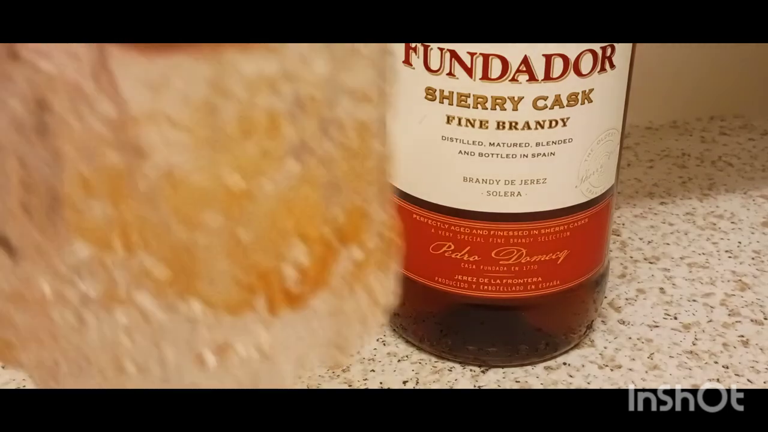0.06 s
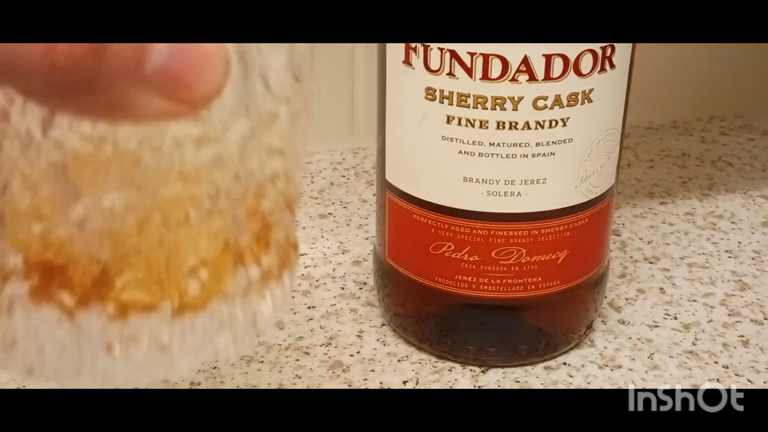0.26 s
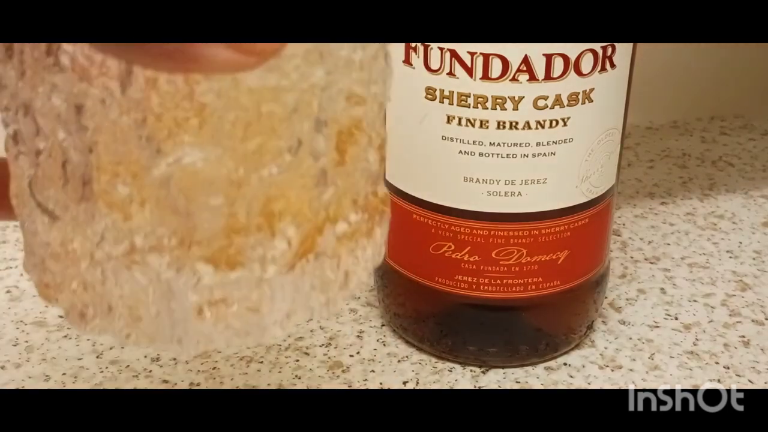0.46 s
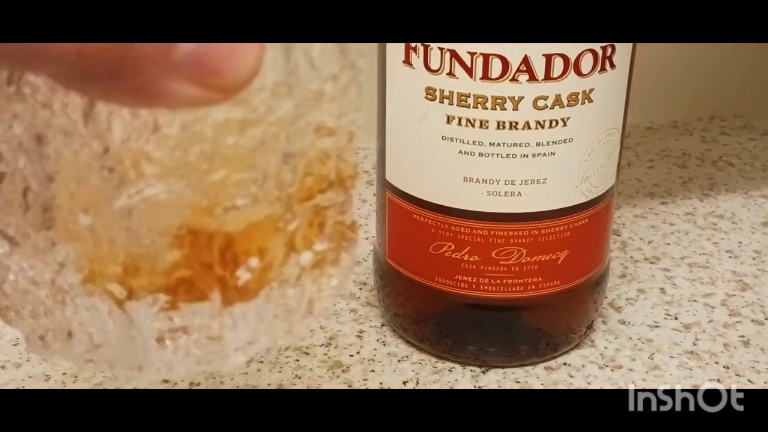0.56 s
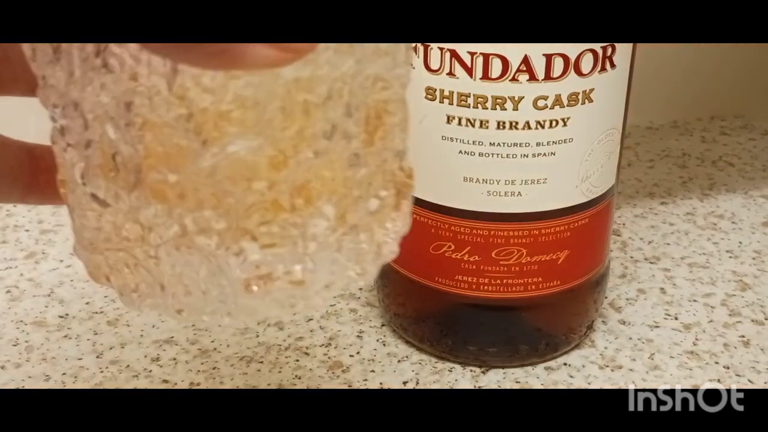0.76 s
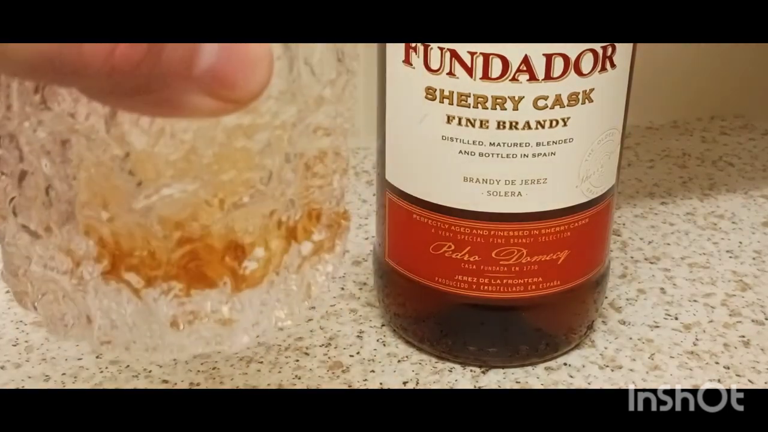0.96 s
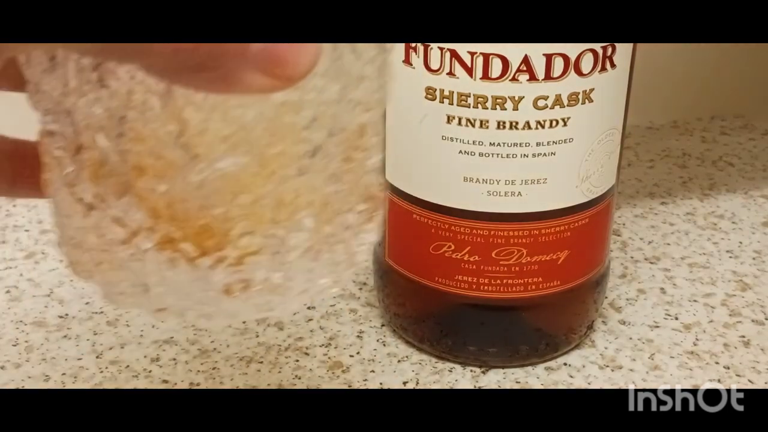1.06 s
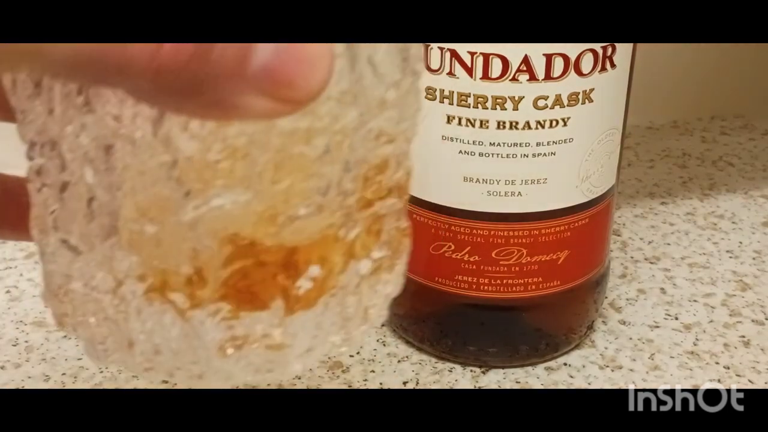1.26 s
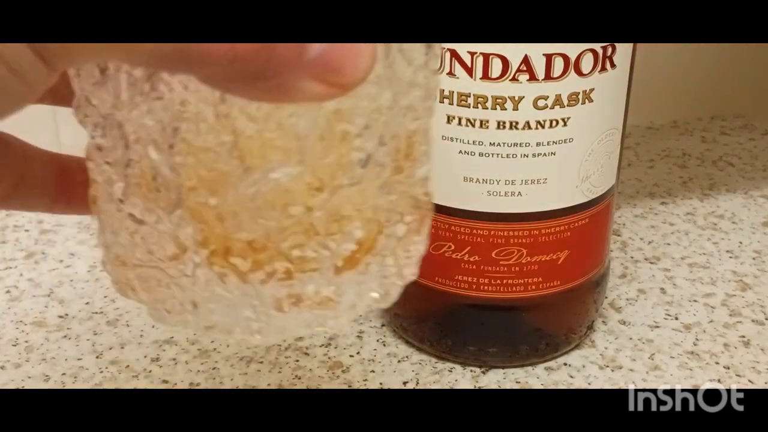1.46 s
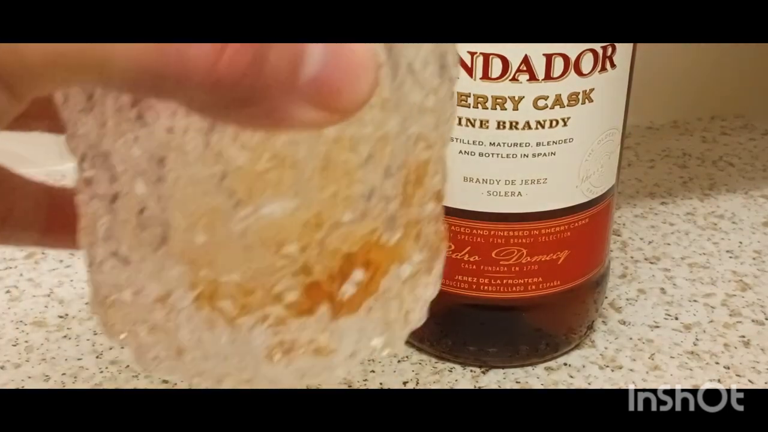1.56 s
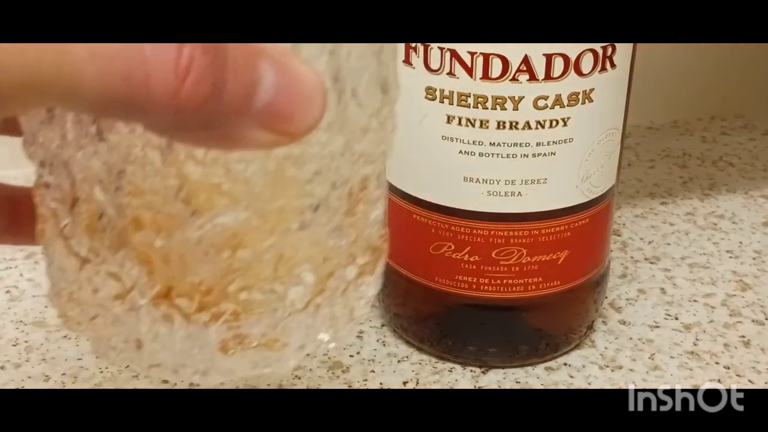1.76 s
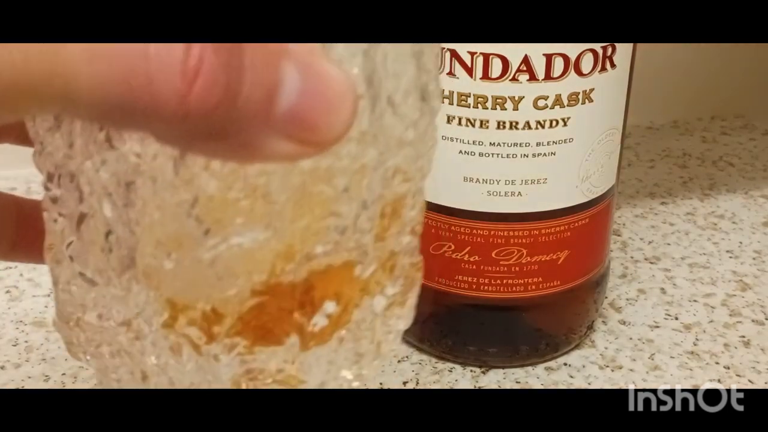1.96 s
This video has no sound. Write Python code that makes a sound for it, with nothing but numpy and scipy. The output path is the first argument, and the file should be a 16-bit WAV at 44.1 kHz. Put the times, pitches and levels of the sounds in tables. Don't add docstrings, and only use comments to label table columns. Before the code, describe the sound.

Ice cubes clink in a thick, hand-held glass with a little liquid. Faint ticks open, then near silence until 0.2 seconds. Bright, short knocks crowd together, densest at 0.39-0.55, with a plopping gulp near 0.52. Scattered clinks follow, strong at 0.8, a lull near 0.95, another cluster around 1.4, a sharp knock at 1.69, soft finger bumps near 1.83, then fading rattles. Close, short kitchen echo, quiet gaps.

```python
import sys
import numpy as np
from scipy import signal
from scipy.fft import rfft, irfft, next_fast_len
from scipy.io import wavfile

SR = 44100
rng = np.random.default_rng(int(sys.argv[2]) if len(sys.argv) > 2 else 0)


def inscribe(sig):
    pcm = np.round(np.clip(np.atleast_2d(sig).T, -1, 1) * 32767)
    wavfile.write(sys.argv[1], SR, pcm.astype(np.int16))


def field_ratio(decibels):
    return 10 ** (np.asarray(decibels, dtype=float) / 20)


N = 88200


def at_hz(points, hz):
    points = np.array(points)
    return np.interp(np.log(np.maximum(hz, 1)), np.log(points[:, 0]), points[:, 1])


def in_time(rows):
    return np.interp(np.arange(N) / SR, *np.transpose(rows))


def rms_one(x):
    return x / np.sqrt(np.mean(x ** 2) + 1e-20)


def ring(clicks, hz, t60):
    r = field_ratio(-60 / (t60 * SR))
    w = 2 * np.pi * hz / SR
    return signal.lfilter([0, np.sin(w)], [1, -2 * r * np.cos(w), r * r], clicks + 1e-18)


def band_pass(order, low, high, x):
    return signal.sosfilt(signal.butter(order, [low, high], "band", fs=SR, output="sos"), x)


def high_pass(order, hz, x):
    return signal.sosfilt(signal.butter(order, hz, "high", fs=SR, output="sos"), x)


def add(out, s, sound):
    i = int(s * SR)
    out[..., i:i + sound.shape[-1]] += sound[..., :N - i]


# [f/Hz, level/dB, t60/s]
GLASS = [(1080, -9, 0.024), (1540, -14.5, 0.053), (1955, -3, 0.0073), (2512, -14, 0.18), (2700, -12, 0.06),
         (3210, -11, 0.014), (3570, -10, .02), (4313, -12, 0.023), (5196, -16, 0.022), (6130, -8, 0.025),
         (6340, -14, 0.04), (6710, -9, 0.036), (7440, -12.5, 0.028), (9720, -27.5, 0.043)]
# [t/s, peak level/dB, contact f/Hz, treble level/dB]
KNOCKS = [(0.0084, -36, 2930, -18), (0.0191, -39, 2920, -31), (0.2061, -30, 6200, -2),
          (0.2239, -20.5, 6200, 0), (0.236, -25, 2700, -1), (0.2524, -14.5, 6080, -10),
          (0.2867, -20.5, 3290, -28), (0.366, -28.5, 2640, -42), (0.3886, -20, 3120, -5),
          (0.394, -11.5, 6120, -7), (0.4044, -15, 6140, -2.5), (0.427, -24, 4150, 7.5),
          (0.442, -16, 7000, -3.5), (0.4556, -11, 5940, -23), (0.47, -18, 6270, -5),
          (0.5025, -24, 6340, -18), (0.5309, -19.5, 6800, -20), (0.593, -28, 3300, -6),
          (0.6222, -28.5, 2790, 1), (0.653, -25, 2850, -29), (0.692, -26.5, 4120, -10),
          (0.7045, -20, 4190, -47), (0.7393, -21.5, 2570, -21), (0.7701, -22, 4000, -14),
          (0.786, -34, 3980, -23), (0.801, -13.5, 6500, -15), (0.836, -21, 6600, -5),
          (0.862, -19.5, 3020, -7.5), (0.8957, -23, 6040, -44),
          (0.9897, -33.5, 2540, -37), (1.0023, -27.5, 2970, -47), (1.02, -17.5, 6000, -16),
               (1.086, -29, 3700, -36), (1.094, -28.5, 2680, -39), (1.111, -37, 6700, -26),
               (1.1515, -18, 6100, -29), (1.2006, -24, 6960, 8.5), (1.2373, -26, 5840, -26),
               (1.251, -21.5, 6060, -15), (1.2538, -30, 2590, -40), (1.3374, -30.5, 5930, -54),
               (1.3729, -22.5, 3130, -13), (1.3885, -16.5, 6600, -31), (1.3971, -12, 6130, -11.5),
               (1.419, -15, 6730, 0.5), (1.4603, -32, 2860, -20), (1.5081, -33.5, 2840, -2),
               (1.534, -23.5, 6330, -25), (1.5429, -29, 6900, -2), (1.6131, -40, 1500, -37),
               (1.6934, -13.5, 6490, -11), (1.7587, -26, 4040, 5), (1.8158, -25.5, 2800, -14),
               (1.87, -28, 4260, -38), (1.8822, -29, 2550, -8), (1.9614, -42, 8800, 8.5),
               (1.9757, -34.5, 4250, 3), (1.9914, -40, 2710, 17)]
# [t/s, peak level/dB, contact f/Hz, treble level/dB]
CLINKS = [(0.0318, -53, 2820, -35), (0.2563, -23.5, 6240, -27), (0.2922, -32, 3230, -22),
          (0.3377, -40, 3540, -34), (0.3696, -37.5, 2700, -33), (0.492, -27, 6500, -21),
          (0.4971, -27.5, 2480, -20), (0.5065, -26, 3980, -10), (0.5231, -38.5, 1305, 8),
          (0.5323, -24, 6550, 3), (0.63, -35.5, 1720, -8), (0.657, -28, 2860, -22),
          (0.6954, -44, 4590, -15), (0.7116, -39, 4270, -31), (0.7787, -39, 3800, -33),
          (0.8722, -42, 2540, -31), (0.8778, -34, 2590, -29), (0.885, -40, 2630, -30),
          (1.0096, -31.5, 2555, -55), (1.0549, -35, 3940, -26), (1.088, -41, 3340, -41),
          (1.121, -56, 6450, -25), (1.1313, -44, 3490, -31), (1.147, -47, 1260, -17),
          (1.1605, -40, 6800, -31), (1.1746, -36, 1593, -46), (1.1949, -38, 6120, -18),
          (1.2586, -39, 6300, -21), (1.3514, -36.5, 3200, -27), (1.3547, -46, 6550, -11),
          (1.4828, -45, 3240, -13), (1.6094, -42, 2920, -25), (1.625, -36, 6300, -11),
          (1.6693, -44.5, 2000, 0), (1.6762, -42, 4280, -15), (1.6889, -29, 6540, -3),
          (1.7009, -47, 6270, -21), (1.7067, -28.5, 6300, -2), (1.7456, -42.5, 6800, 13),
          (1.7636, -36.5, 4060, -5), (1.7815, -48, 4500, 9), (1.786, -39, 3640, -8),
          (1.8116, -39, 3600, -27), (1.8227, -36, 2700, -29), (1.845, -50, 2600, -20),
          (1.8481, -38.5, 5800, -22), (1.9839, -54, 4220, -17), (1.9875, -43, 4030, 8)]
CLINK_DB = 5.5
DETUNE = 0.025
STRIKE_SPREAD_DB, SIDE_SPREAD_DB = 5, 6
COLOUR_DB_PER_OCTAVE, LONGEST_T60_S = 6, 0.12
CONTACT_DB, CONTACT_CYCLES, CONTACT_RISE_S = 8.5, 36, 0.0007
CRACK_DB, CRACK_S, THUMP_DB = -6.5, 0.0039, -2.5


def knocks():
    out = np.zeros((2, N))
    t = np.arange(3500) / SR
    modes = np.array(GLASS + GLASS)
    mode_hz, mode_db = modes[:, :1], modes[:, 1:2]
    mode_t60 = np.minimum(np.minimum(modes[:, 2:], LONGEST_T60_S), mode_hz / 22000)
    clinks = [(s, db + CLINK_DB, hz, treble_db) for s, db, hz, treble_db in CLINKS]
    for s, db, hz, treble_db in KNOCKS + clinks:
        level_luck, pitch_luck, side_luck, phase_luck = rng.uniform(-1.3, 1, (4, len(modes), 1))
        noise = rng.standard_normal((2, 3, len(t)))

        colour_db = COLOUR_DB_PER_OCTAVE * np.abs(np.log2(mode_hz / hz))
        wall_db = mode_db + STRIKE_SPREAD_DB * level_luck - colour_db - 60 * t / mode_t60
        wall_hz = mode_hz * (1 + 0.47 * DETUNE * pitch_luck)
        wall = field_ratio(wall_db) * np.sin(2 * np.pi * wall_hz * t + 3 * phase_luck)
        sides = field_ratio(SIDE_SPREAD_DB * side_luck[:, 0] * [[1], [-1]])
        sides = sides * np.sign(phase_luck[:, 0] + [[9], [0.5]])

        second_hz = hz * (1 + 3 * DETUNE * pitch_luck[0])
        pair = np.sin(2 * np.pi * hz * t) + 0.5 * np.sin(2 * np.pi * second_hz * t)
        contact = field_ratio(CONTACT_DB - 60 * t * hz / CONTACT_CYCLES) * pair

        crack = band_pass(2, 7600, 14500, noise[0, 0] + noise[0, 1:])
        thump = band_pass(3, 0.4 * hz, min(2 * hz, 7600), noise[1, 0] + noise[1, 1:])
        burst = field_ratio(CRACK_DB + treble_db) * crack + field_ratio(THUMP_DB) * thump

        hit = sides @ wall + contact + burst * np.exp(-t / CRACK_S)
        add(out, s, field_ratio(db) * hit * (1 - np.exp(-(t / CONTACT_RISE_S) ** 2)))
    return out


# [t/s, level/dB]
SWIRL = [(0, -36), (.09, -63.5), (.16, -68.5), (.22, -38), (.3, -32), (.36, -42), (.44, -28), (.57, -38),
         (.63, -37.5), (.85, -32), (.96, -53.5), (1.05, -38.5), (1.25, -43.5), (1.32, -54), (1.42, -36.5),
         (1.58, -47), (1.8, -42), (1.95, -57.5)]
TICKS_PER_S, TICK_SPREAD_DB = 500, 4
MODES_STRUCK = 0.12
SPLASH_DB = 9.5


def rattle():
    sizes = field_ratio(TICK_SPREAD_DB * np.minimum(rng.exponential(1, N), 2.1))
    ticks = sizes * (rng.random(N) < TICKS_PER_S / SR)
    at = np.flatnonzero(ticks)
    spray = rng.standard_normal((2, N)) * signal.lfilter([0.05], [1, -0.996], ticks)
    out = field_ratio(SPLASH_DB) * signal.lfilter([0.5], [1, -0.5], spray)
    for hz, db, t60 in GLASS * 3:
        struck = rng.random(len(at)) < MODES_STRUCK
        clicks = np.zeros(N)
        clicks[at] = ticks[at] * field_ratio(db + 8) * rng.standard_normal(len(at)) * struck
        soft_clicks = np.convolve(clicks, [0.25, 0.5, 0.25], "same")
        shifted_hz = hz * (1 + 2 * DETUNE * rng.uniform(-1, 1))
        sound = ring(soft_clicks, shifted_hz, min(0.7 * t60, 90 / hz, hz / 30000))
        out = out + sound * field_ratio(SIDE_SPREAD_DB * rng.uniform(-1, 1) * np.array([[1], [-1]]))
    return field_ratio(in_time(SWIRL)) * rms_one(out)


# [t of peak/s, peak level/dB, f/Hz, length/s]
GULPS = [(0.31, -31, 990, 0.025), (0.442, -16, 1090, 0.0028), (0.455, -26.5, 768, 0.017),
         (0.462, -17.5, 1080, 0.0041), (0.468, -22.5, 1230, 0.0088), (0.504, -27.5, 796, 0.014),
         (0.519, -7, 1080, 0.013), (0.531, -8, 1740, 0.002), (1.009, -27, 1130, 0.0061),
         (0.698, -28.5, 717, 0.01), (1.616, -30.5, 1150, 0.0041), (0.227, -28.5, 1010, 0.006),
         (0.743, -14, 1116, 0.0077), (1.151, -28.5, 1080, 0.008)]
GULP_RISE = 0.15


def gulps():
    out = np.zeros(N)
    for s, db, hz, length in GULPS:
        t = np.arange(-2 * length, 2 * length, 1 / SR)
        phase = 2 * np.pi * hz * (t + GULP_RISE * t ** 2 / (2 * length))
        swell = np.exp(-4.5 * np.abs(t / length) ** 1.23)
        add(out, max(s - 2 * length, 0), field_ratio(db) * swell * np.sin(phase))
    return out


# [t/s, peak level/dB, f/Hz, t60/s]
BUMPS = [
    (0.251, -50, 294.5, 0.037),
    (0.361, -50, 285, 0.13),
    (0.406, -45.5, 342, 0.031),
    (.442, -45, 345, 0.095),
    (0.886, -50.5, 145, 0.19),
    (1.562, -46, 135, 0.024),
    (1.822, -39.5, 303, 0.083),
    (1.853, -36.5, 347, 0.021),
]
# [t/s, level/dB]
GRIP = [(0, -72), (.09, -67), (.16, -77), (.24, -61.5), (.33, -70), (.46, -61), (.6, -68.5), (.85, -57.5),
        (.97, -78), (1.15, -66), (1.3, -76.5), (1.42, -64), (1.55, -70), (1.68, -57.5), (2, -62)]
GRIP_HZ, GRIP_WIDTH_HZ = 340, 110
BUMP_SOFT_S = 0.003


def hand():
    out = np.zeros(N)
    t = np.arange(SR // 2) / SR
    for s, db, hz, t60 in BUMPS:
        rub = np.diff(rng.standard_normal(len(t) + 1))
        puff = rub * field_ratio(-60 * t / t60) * (1 - np.exp(-t / BUMP_SOFT_S))
        puff = ring(ring(puff, hz, 7 / hz), hz, 4 / hz)
        add(out, s, field_ratio(db) * puff / np.abs(puff).max())
    rumble = ring(rng.standard_normal(N), GRIP_HZ, 2.2 / GRIP_WIDTH_HZ)
    rumble = ring(rumble, GRIP_HZ, 1 / GRIP_WIDTH_HZ)
    return high_pass(3, 75, out + field_ratio(in_time(GRIP)) * rms_one(rumble))


# [f/Hz, t60/s]
ROOM = [(500, 0.18), (2500, 0.24), (14000, 0.16)]
ROOM_DB, ROOM_TREBLE_DB, ROOM_GAP_S = -4.5, 1, 0.004


def kitchen(x):
    t = np.arange(SR // 2) / SR
    build_up = 1 - np.exp(-(t / ROOM_GAP_S) ** 2)
    tail = 0
    for low in 60 * 2.0 ** np.arange(9):
        band = band_pass(2, low, min(2 * low, 0.45 * SR), rng.standard_normal((2, len(t))))
        t60 = at_hz(ROOM, 0.8 * low)
        tail = tail + band * field_ratio(ROOM_TREBLE_DB * (low > 7000) - 60 * t / t60) * build_up
    tail = tail / np.sqrt(np.sum(tail ** 2) / 2)
    return field_ratio(ROOM_DB) * signal.fftconvolve(x[None], tail, axes=1)[:, :N]


# [f/Hz, level/dB per Hz]
AIR = [(25, -8), (150, -12), (350, -4), (550, -12), (16000, -29)]
AIR_DB = -78


def air():
    white = rng.standard_normal((3, N))
    shape = field_ratio(at_hz(AIR, np.arange(N // 2 + 1) * SR / N))
    return field_ratio(AIR_DB) * rms_one(irfft(rfft(white[0] + 0.7 * white[1:]) * shape, N))


# [f/Hz, left over right level/dB]
MIC_LEFT = [(200, 0), (1000, 5), (5000, 0), (13000, -0.5)]
RIGHT_LAG_S = 0.00021
BODY_CUT_HZ, GULP_ROOM_DB = 800, -3.5


def scene():
    glass = high_pass(4, BODY_CUT_HZ, knocks() + rattle())
    low = gulps() + hand()
    echoes = kitchen(glass.mean(axis=0) + field_ratio(GULP_ROOM_DB) * low)
    size = next_fast_len(N + 512)
    hz = np.arange(size // 2 + 1) * SR / size
    tilt = field_ratio(at_hz(MIC_LEFT, hz) / 2)
    ports = np.array([tilt, np.exp(-2j * np.pi * hz * RIGHT_LAG_S) / tilt])
    near = irfft(rfft(glass + low + echoes, size) * ports, size)[:, :N]
    return near + air()


def roll_off(x):
    return signal.sosfilt(signal.butter(12, 16810, fs=SR, output="sos"), x)


GATE_DB, GATE_SLOPE, GATE_RELEASE_S, GATE_DEPTH_DB = -51, 0.56, 0.0047, 20
BASS_GATE_SHARE = 0.97
CUTOFF_HZ = 16900


def record(dry):
    r = np.exp(-1 / (GATE_RELEASE_S * SR))
    bass = signal.filtfilt(*signal.butter(2, 500, fs=SR), dry)
    rest = dry - bass
    power = signal.filtfilt([1 - r], [1, -r], np.mean(rest ** 2, axis=0))
    level_db = 10 * np.log10(np.abs(power) + 1e-12)
    cut_db = np.clip(GATE_SLOPE * (GATE_DB - level_db), 0, GATE_DEPTH_DB)
    gated = bass * field_ratio(-BASS_GATE_SHARE * cut_db) + rest * field_ratio(-cut_db)
    mix = signal.sosfilt(signal.cheby2(12, 70, CUTOFF_HZ, fs=SR, output="sos"), gated)
    return roll_off(mix)


dry = scene()
out = record(dry)
inscribe(out)
```